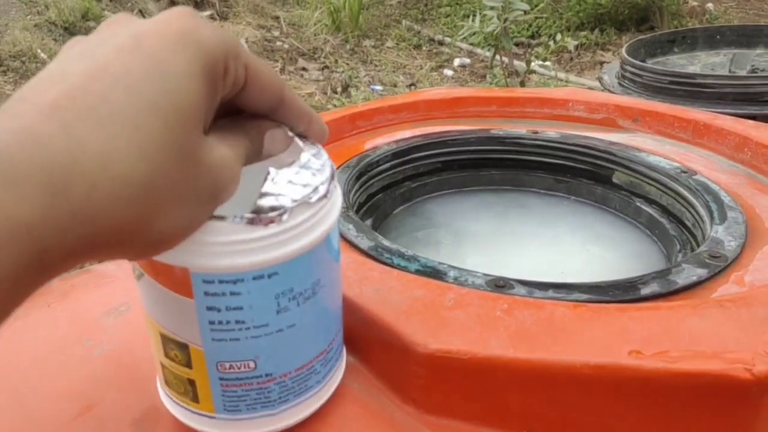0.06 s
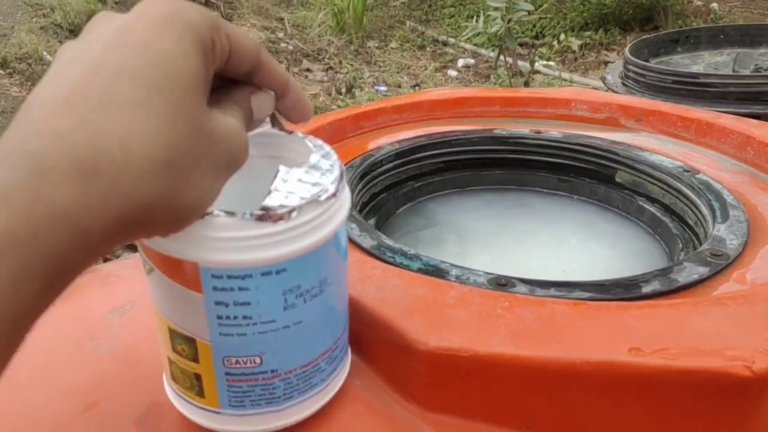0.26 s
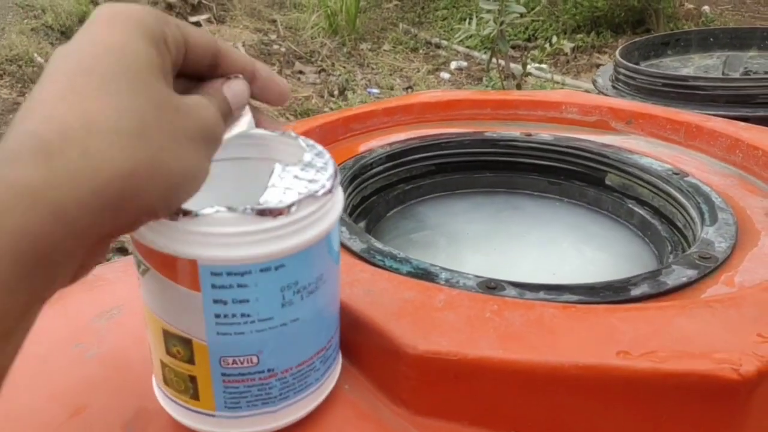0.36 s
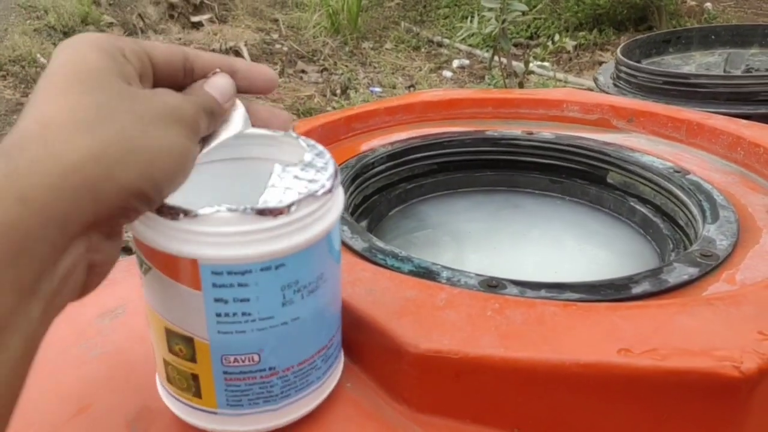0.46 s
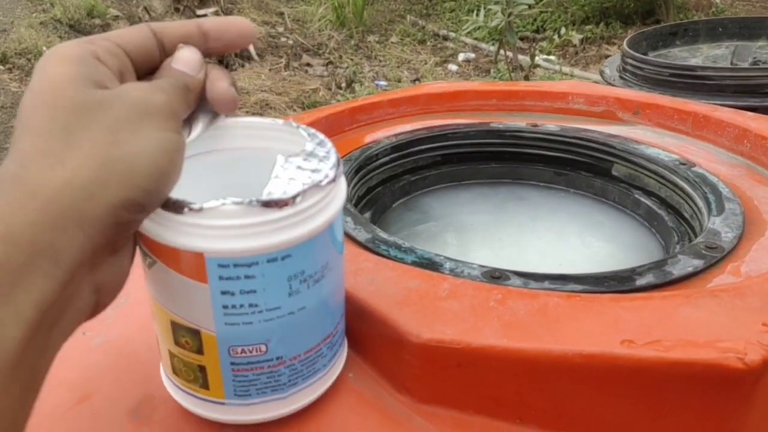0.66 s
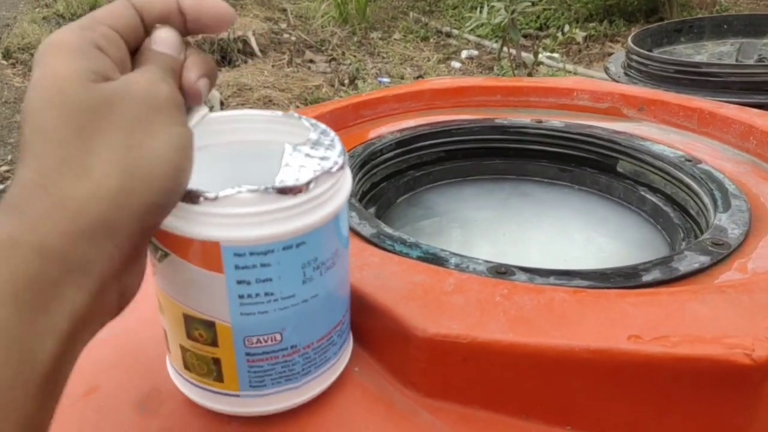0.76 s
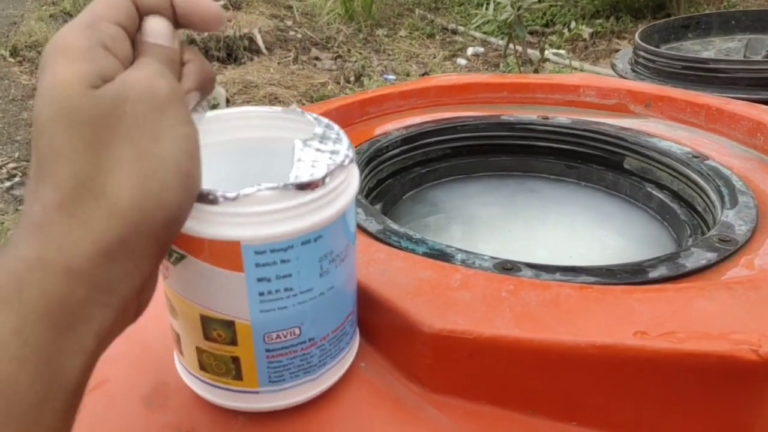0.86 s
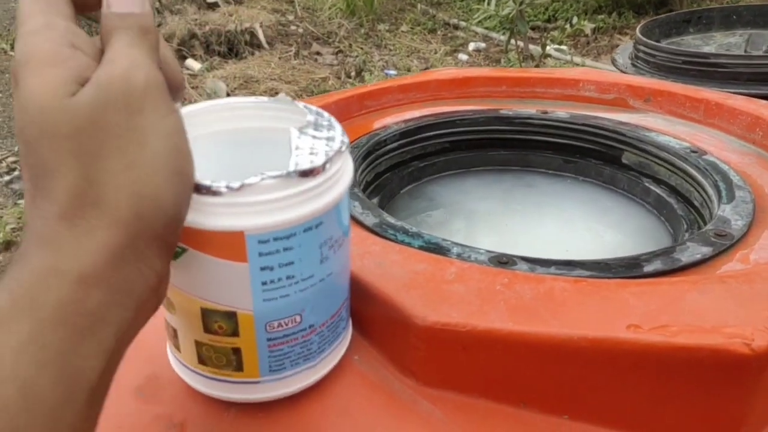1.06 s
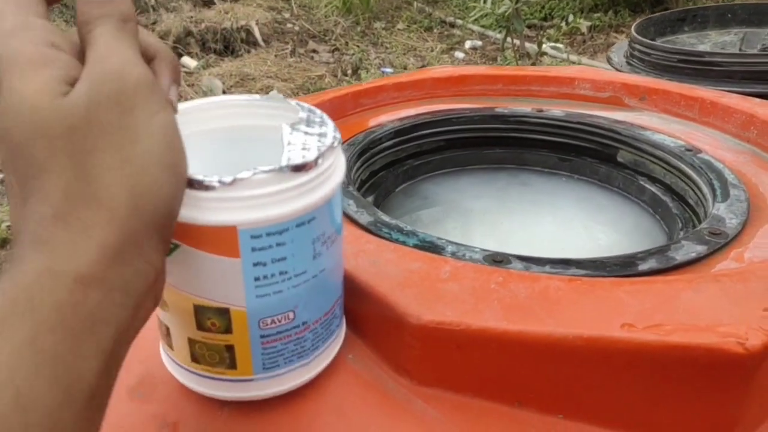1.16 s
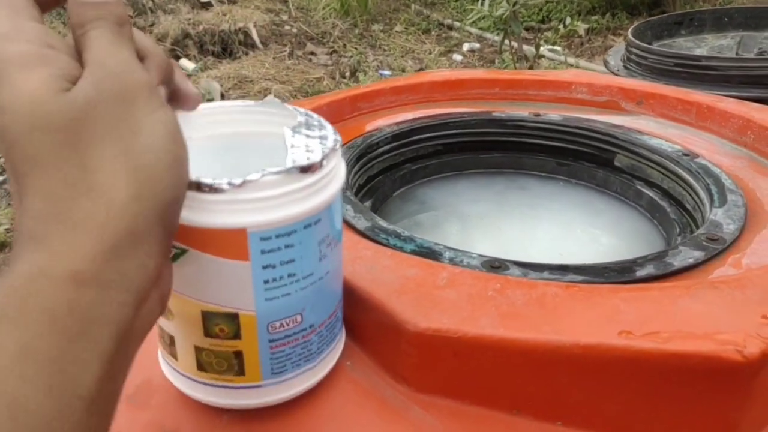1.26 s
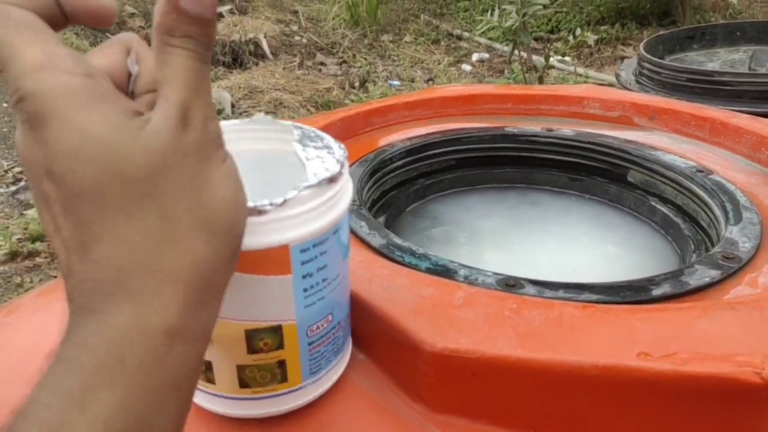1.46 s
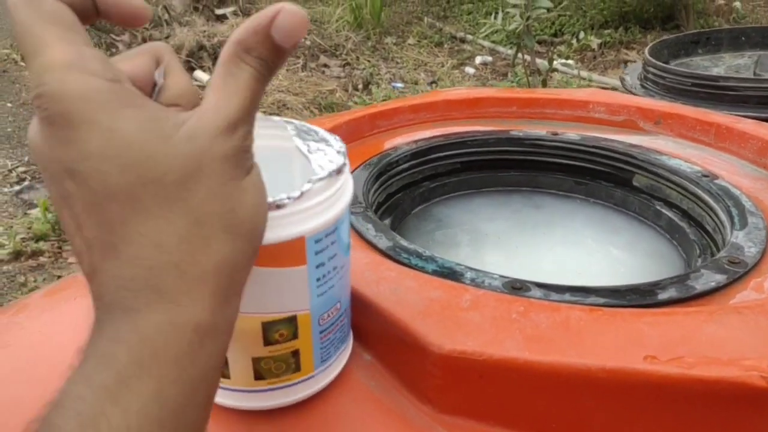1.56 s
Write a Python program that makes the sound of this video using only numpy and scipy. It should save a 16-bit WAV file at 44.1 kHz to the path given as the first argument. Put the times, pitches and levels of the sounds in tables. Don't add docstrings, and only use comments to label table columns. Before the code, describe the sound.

Foil lid seal ripped from a plastic jar, crinkling and tapping, outdoors with small bird chirps

```python
import sys
import numpy as np
from scipy import signal
from scipy.fft import rfft, irfft
from scipy.io import wavfile

SR = 44100
rng = np.random.default_rng(int(sys.argv[2]) if len(sys.argv) > 2 else 0)


def boost(x):
    u = np.asarray(x, float) / 20
    return 10 ** u


def transcribe(signal):
    frames = np.atleast_2d(signal).T
    limited = np.clip(frames, -1, 1)
    pcm = np.round(limited * 32767).astype(np.int16)
    wavfile.write(sys.argv[1], SR, pcm)


N = 72765
T = np.arange(N) / SR


def rms_one(x):
    return x / np.sqrt(np.mean(x ** 2) + 1e-20)


def peak_one(x):
    return x / np.abs(x).max()


def in_time(rows):
    return np.interp(T, *np.transpose(rows))


def at_hz(points, hz):
    curve = np.array(points)
    return np.interp(np.log(hz), np.log(curve[:, 0]), curve[:, 1])


def filtered(x, order, hz, kind):
    return signal.lfilter(*signal.butter(order, hz, kind, fs=SR), x)


def filtered_steep(x, order, hz, kind):
    return signal.sosfilt(signal.butter(order, hz, kind, fs=SR, output="sos"), x)


def add(out, s, x):
    i = min(int(s * SR), len(out))
    out[i:i + len(x)] += x[:len(out) - i]


def drift(rate):
    r = np.exp(-80 * np.pi * rate / SR)
    noise = rng.standard_normal(N // 40 + 2002)
    slow = signal.lfilter([1], [1, -2 * r, r * r], noise)[2000:]
    return np.interp(np.arange(N) / 40, np.arange(len(slow)), rms_one(slow))


def ring(clicks, hz, t60):
    r, w = boost(-60 / (t60 * SR)), 2 * np.pi * hz / SR
    return signal.lfilter([0, np.sin(w)], [1, -2 * r * np.cos(w), r * r], clicks + 1e-18)


def per_port(noise):
    return noise[0] + 0.7 * filtered(noise[1:], 2, 1300, "high")


# pitch in Hz, likeness from 0 to 1.
LIKENESS = [(40, 0.17), (130, 0.88), (290, 0.29), (640, 0.4), (1400, 0.14), (8000, 0.14)]


def bands(spectrum, patchy_db, white, alike=LIKENESS):
    out, edges = 0, 20 * 2 ** np.arange(0, 9.9, 1 / 3)
    for k, (low, high) in enumerate(zip(edges, edges[1:])):
        hz = np.sqrt(low * high)
        if at_hz(spectrum, hz) < -55:
            continue
        mid, side = filtered_steep(white[k % 2], 2, [low, high], "band")
        c = np.clip(at_hz(alike, hz), 0, 1)
        pair = np.sqrt(1 + c) * mid + np.sqrt(1 - c) * side * [[1], [-1]]
        out = out + boost(at_hz(spectrum, hz) + patchy_db * drift(26)) * pair
    return rms_one(out)


# pitch in Hz, level in dB, fade time (60 dB) in seconds.
JAR = [(113.3, -22, 0.25), (255, -9, 0.09), (434, -23, .07), (700, -30, 0.0085), (900, -1, 0.021),
       (1102, 4, 0.0062), (1600, 3, 0.0063), (2480, -12, 0.025), (4200, 0, 0.009), (5850, 11, 0.0039),
       (10300, 5, 0.0041), (11700, 3, 0.004), (13600, 0, .004)]


def tear():
    tear_s, tear_db, lead_s, lead_db = 0.2236, -22, 0.003, -40
    blow = np.zeros(N)
    for late_s, push in [(0, 0.7), (-0.0002, -0.4), (0.0004, 0.3)]:
        add(blow, tear_s + late_s, np.array([push]))
    since = T - tear_s
    lead = (T > tear_s - lead_s) & (T < tear_s)
    crackle = lead * boost(lead_db + 8000 * since * lead)
    after = (T > tear_s) * boost(-40.5 - 60 * np.abs(since) / 0.06)
    after = after + boost(-14.0) * np.exp(-((since - 0.0003) / 0.00043) ** 2)
    blow = blow + per_port(rng.standard_normal((3, N))) * (crackle + after)
    return boost(tear_db) * sum(boost(db) * ring(blow, hz, t60) for hz, db, t60 in JAR)


# time of the swell's peak in seconds, peak level in dB, pitch in Hz, length in ms, sizzle
# level in dB.
SNAPS = [(0.097, -46, 4100, 1.6, -38.5), (0.1336, -32, 2400, 0.96, -52), (.136, -41, 4160, 1.5, -34),
         (0.244, -28, 4000, 5.5, -6.5), (0.2432, -27.5, 2210, 4, -30), (.244, -35.5, 5700, 1.2, 2),
         (.326, -57.5, 900, 0.84, -30), (.430, -50.5, 2910, 1.2, 6.5), (0.6, -57.5, 4850, 1.6, 6),
         (0.6656, -39, 2620, 1.8, -10.5), (.666, -40, 4080, 1.9, -28), (1.029, -39.5, 5000, 0.39, -34.5),
         (1.031, -32.5, 3740, 0.85, -29), (1.0313, -38.5, 2520, 0.83, -33.5),
         (1.0381, -24, 2570, 0.53, -24), (1.0388, -27, 3600, 0.63, -30), (1.2014, -48.5, 5490, 1.5, 6.5),
         (1.204, -37.5, 4100, 0.8, -15.5), (1.24, -54, 5000, 0.45, 10), (1.2643, -33, 6124, 0.356, 3),
         (1.2787, -41.5, 3370, 1.5, 1), (1.279, -47, 5900, 2, 0), (1.375, -46, 3610, 2.1, -8),
         (1.378, -40, 2400, 4.8, -27), (1.482, -47.5, 1956, 0.87, -44), (1.492, -35, 2070, 1.2, -23),
         (1.5601, -29, 2860, 0.93, -15), (1.5606, -27.5, 3540, 0.63, -25.5), (1.5612, -36, 3940, 0.86, -25),
         (1.592, -44.5, 2900, 3.3, 6)]
# pitch in Hz, level in dB, fade time (60 dB) in seconds.
FOIL = [(2360, 2, 0.014), (3120, -12.5, 0.0013), (3520, -11, 0.0039), (4053, -1.5, 0.0076),
        (5000, 0.5, 0.0051)]
# pitch in Hz, level in dB, fade time (60 dB) in seconds.
THUD = [(330, -13, 0.017), (520, -15.5, 0.053), (886, 3.5, 0.023), (1110, 0.5, 0.004)]


def body(modes, slips, luck):
    out = 0
    for k, (hz, db, t60) in enumerate(modes):
        out = out + (-1) ** k * boost(db + luck[k]) * ring(slips, hz, t60)
    return peak_one(out)


def snaps():
    own_t60_s, thud_db, foil_share, sizzle_hz = 0.004, -36.5, 0.3, 6500
    after_db, after_t60_s = -25, 0.05
    out, t = np.zeros((2, N)), T[:3000] - 0.01
    for s, db, hz, length_ms, sizzle_db in SNAPS:
        noise, luck = rng.standard_normal((2, 3, len(t))), rng.normal(0, 2.5, 14)
        slips = peak_one(per_port(noise[0]) * np.exp(-(t * 1000 / length_ms) ** 2))
        slips = slips + boost(after_db - 60 * t / after_t60_s) * per_port(noise[1]) * (t > 0)
        own = peak_one(ring(ring(slips, hz, own_t60_s), hz, own_t60_s / 2))
        sheet = filtered(body(FOIL, slips, luck), 2, [1500, 6000], "band")
        foil = peak_one(own + foil_share * sheet)
        thud = boost(thud_db) * body(THUD, slips, luck[5:])
        sizzle = boost(sizzle_db) * peak_one(filtered(slips, 3, sizzle_hz, "high"))
        add(out.T, s - 0.01, boost(db) * (foil + thud + sizzle).T)
    return out


# start in seconds, peak level in dB, pitch in Hz.
TAPS = [(0.0139, -48, 684), (0.03, -56.5, 685), (.134, -45, 525), (.144, -46.5, 578), (0.152, -44, 520),
        (.240, -30.5, 322), (.246, -68.5, 463), (0.258, -48, 250), (0.33, -50, 130), (1.278, -56.5, 822),
        (1.489, -55.5, 520), (1.578, -48, 246), (1.588, -72, 330)]


def taps():
    tap_t60_s = 0.028
    out, push = np.zeros(N), np.pad(np.hanning(44), (0, 3000))
    for s, db, hz in TAPS:
        wall = ring(push, hz, tap_t60_s) + 0.7 * ring(push, 1.45 * hz, tap_t60_s)
        add(out, s, boost(db) * peak_one(wall))
    return out


# start in seconds, length in seconds, dull level and bright level in dB.
STROKES = [(0.059, 0.38, -67, -88.5), (0.215, 0.098, -47.5, -50.5), (0.279, 0.16, -67.5, -70),
           (0.416, 0.2, -70.5, -70), (0.658, 0.076, -66, -68), (0.682, 0.22, -78.5, -65),
           (0.729, 0.024, -78, -64), (1.06, 0.13, -64, -66), (1.247, 0.087, -66, -63.5),
           (1.368, 0.061, -72, -68), (1.464, 0.15, -61, -93), (1.543, 0.2, -61, -61)]
# pitch in Hz, level in dB per Hz.
DULL = [(150, -39.5), (300, -3), (900, -2), (1500, -2.5), (2500, 0.5), (5500, -8), (7500, -25), (9000, -60)]
# pitch in Hz, level in dB per Hz.
BRIGHT = [(2500, -60), (4000, -16), (7500, -5), (10500, -1), (14500, 0), (16000, -15)]
# pitch in Hz, likeness from 0 to 1.
RUSTLE_LIKENESS = [(300, .9), (900, .6), (2000, .3), (9000, .2)]


def rustle():
    creases_per_s, shape = 7200, (2, 2, N)
    grains = (rng.random(shape) < creases_per_s / SR) * rng.standard_normal(shape) * boost(2 * drift(40))
    dull, bright = np.zeros((2, N))
    for s, length, dull_db, bright_db in STROKES:
        swell = np.sin(np.pi * np.clip((T - s) / length, 0, 1) ** 0.45) ** 2
        dull = dull + boost(dull_db) * swell
        bright = bright + boost(bright_db) * swell
    dull = dull * bands(DULL, patchy_db=2, white=grains, alike=RUSTLE_LIKENESS)
    return dull + bright * bands(BRIGHT, patchy_db=2, white=grains, alike=RUSTLE_LIKENESS)


def ground(x):
    echo_db, echo_t60_s = -14, 0.02
    tail = rng.standard_normal((2, 2000)) * boost(-60 * T[:2000] / echo_t60_s)
    tail = signal.lfilter([1, -1], [1, -0.9], tail)
    tail = tail / np.sqrt(np.sum(tail ** 2) / 2)
    return boost(echo_db) * signal.fftconvolve(x[None], tail)[:, :N]


def whistle(db, length, from_hz, to_hz):
    u = np.arange(int(length * SR)) / (length * SR)
    phase = 2 * np.pi * np.cumsum(from_hz + (to_hz - from_hz) * u ** 1.2) / SR
    return boost(db) * np.sin(np.pi * u) ** 0.6 * np.sin(phase)


# start in seconds, level in dB.
SONGS = [
    (.037, -54),
    (.296, -54),
    (.556, -59),
    (.827, -59),
    (1.099, -57),
    (1.373, -59),
    (1.63, -63),
]
# start and length in seconds, first and last pitch in Hz, level in dB.
NOTES = [
    (0, .021, 4700, 3600, -1),
    (.025, .018, 4230, 3880, 3),
]
# start and length in seconds, first and last pitch in Hz, level in dB.
FAR_NOTES = [
    (.145, .018, 5450, 4850, -64),
    (.175, .04, 5700, 6400, -70),
    (1.098, .018, 6450, 5900, -68),
    (1.308, .015, 3650, 3550, -65),
    (1.328, .015, 3650, 3550, -65),
    (1.414, .02, 6450, 5750, -67),
]


def bird():
    buzz_after_s, buzz_s, buzz_db = 0.068, 0.065, -64
    buzz_hz, buzz_rise_hz, buzz_width_hz = 6400, 130, 170
    echo_db, echo_t60_s = -6, 0.3
    out, buzz, noise = np.zeros(N), np.zeros(N), rng.standard_normal((3, N))
    for s, db in SONGS:
        for start, length, from_hz, to_hz, note_db in NOTES:
            add(out, s + start, whistle(db + note_db, length, from_hz, to_hz))
        u = np.clip((T - s - buzz_after_s) / buzz_s, 0, 1)
        phase = 2 * np.pi * np.cumsum(buzz_hz + buzz_rise_hz * np.minimum(2 * u, 1)) / SR
        wobble = rms_one(filtered(noise[:2], 2, buzz_width_hz, "low"))
        rough = wobble[0] * np.sin(phase) + wobble[1] * np.cos(phase)
        buzz += boost(buzz_db) * np.sin(np.pi * u) ** 0.5 * rough
    for s, length, from_hz, to_hz, db in FAR_NOTES:
        add(out, s, whistle(db, length, from_hz, to_hz))
    out += buzz
    leaves = noise[2, :12000] * boost(-60 * T[:12000] / echo_t60_s)
    leaves = leaves / np.sqrt(np.sum(leaves ** 2))
    return out + boost(echo_db) * signal.fftconvolve(out, leaves)[:N]


# time in seconds, level in dB.
INSECT = [
    (0.0, -105),
    (0.182, -71),
    (0.302, -77.5),
    (0.738, -64.5),
    (0.872, -67.5),
    (1.106, -84.5),
    (1.364, -70),
    (1.566, -68),
    (1.65, -68),
]


def insects():
    out = 0
    for hz, width_hz, db in [(2567, 580, in_time(INSECT)), (4100, 350, -72)]:
        noise = rng.standard_normal((2, N))
        hiss = rms_one(filtered_steep(noise, 2, [hz - width_hz / 2, hz + width_hz / 2], "band"))
        out = out + hiss * boost(db + 2 * drift(42) + np.array([[1.5], [-3.5]]))
    return out


# pitch in Hz, level in dB per Hz.
AIR = [(250, -8.5), (1500, -14.5), (3300, -9.5), (5000, -3.5), (6500, -14.5), (7600, -15.5), (14500, -16),
       (16000, -35)]


def air():
    hiss = bands(AIR, patchy_db=1.5, white=rng.standard_normal((2, 2, N)))
    return boost(-70) * hiss * boost(np.array([[1.5], [-1.5]]))


# time in seconds, level in dB.
GUST = [(0.0, -62.5), (0.058, -78.5), (0.192, -64.5), (0.228, -50.5), (0.45, -71.5), (0.656, -59.5),
        (0.808, -77.5), (0.864, -65.5), (1.106, -73.5), (1.194, -80), (1.616, -61.5), (1.65, -57.5)]
# pitch in Hz, level in dB per Hz.
WIND = [(20, -40), (32, -24.5), (60, -7.5), (90, -4), (125, -0.5), (190, -26), (280, -11.5), (400, -42.5),
        (600, -56.5)]


def wind():
    rumble = bands(WIND, patchy_db=3.5, white=rng.standard_normal((2, 2, N)))
    return boost(in_time(GUST)) * rumble * boost(np.array([[-1.5], [1.5]]))


# pitch in Hz, left over right in dB.
LEFT_DB = [(60, -3), (400, 0), (1300, 0), (2400, 3.5), (4400, 4.5), (6500, 3), (9000, -8), (13000, 0)]


def ports(x, lag_s):
    lag_from_hz = 1050
    hz = np.fft.rfftfreq(N, 1 / SR) + 1
    tilt = boost(at_hz(LEFT_DB, hz) / 2)
    half = np.exp(-1j * np.pi * hz * lag_s * hz ** 2 / (hz ** 2 + lag_from_hz ** 2))
    return irfft(rfft(x, N) * np.array([tilt * half, 1 / (tilt * half)]), N)


def scene():
    foil = filtered_steep(tear() + snaps() + taps() + rustle(), 4, 80, "high")
    hand = ports(foil, lag_s=0.00042) + ground(foil.mean(axis=0))
    return hand + ports(bird(), lag_s=0.00052) + insects() + air() + wind()


def band_limit(x):
    return signal.sosfilt(signal.butter(12, 16810, fs=SR, output="sos"), x)


def record(dry):
    dry = filtered_steep(dry, 2, 35, "high")
    dry = filtered_steep(dry, 10, 15700, "low")
    return band_limit(dry)


dry = scene()
out = record(dry)
transcribe(out)
```